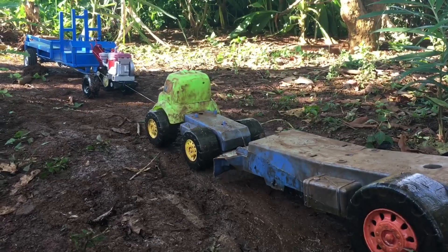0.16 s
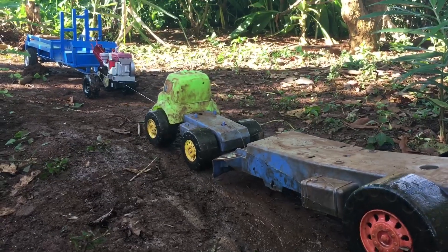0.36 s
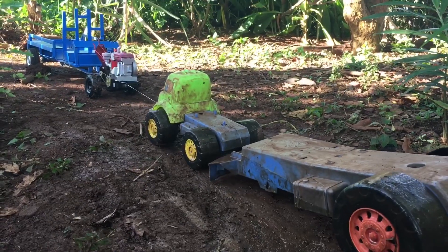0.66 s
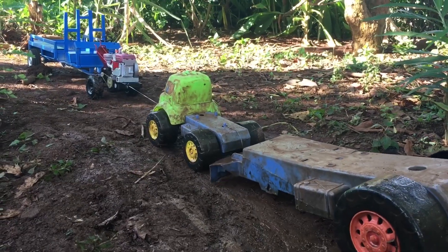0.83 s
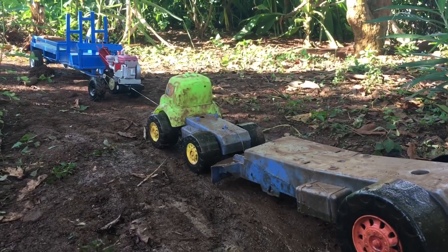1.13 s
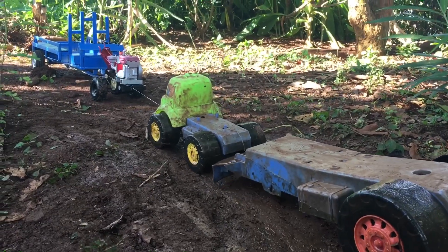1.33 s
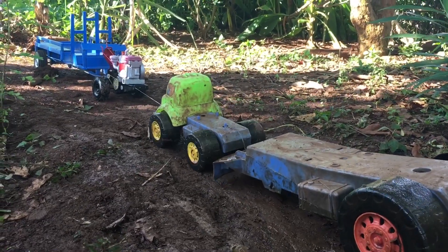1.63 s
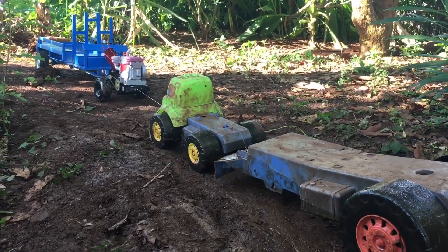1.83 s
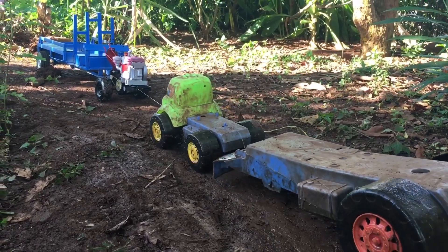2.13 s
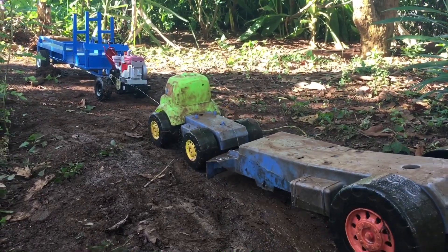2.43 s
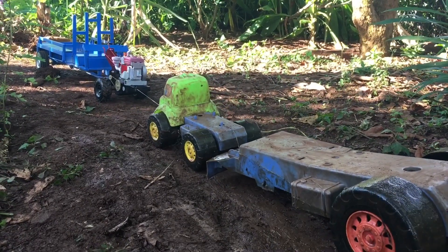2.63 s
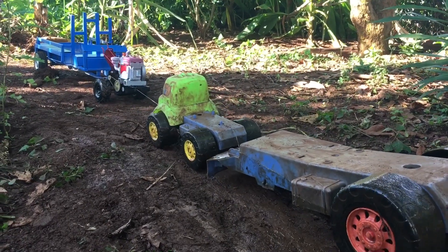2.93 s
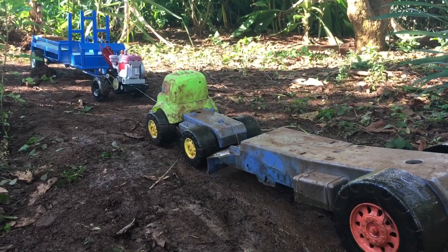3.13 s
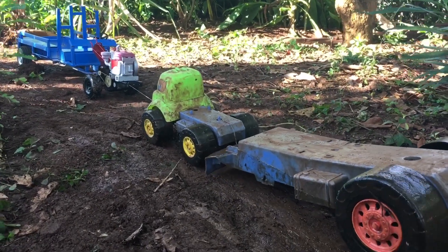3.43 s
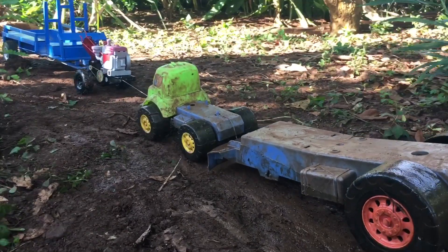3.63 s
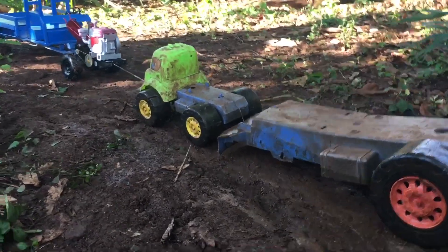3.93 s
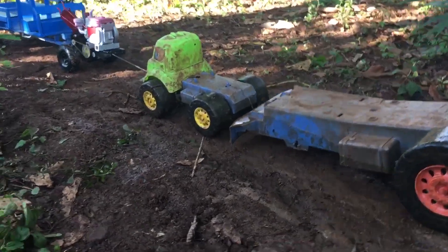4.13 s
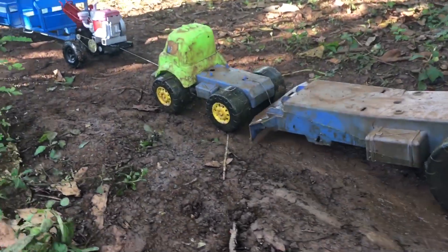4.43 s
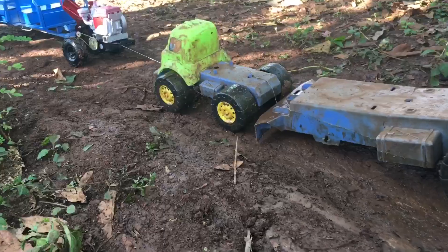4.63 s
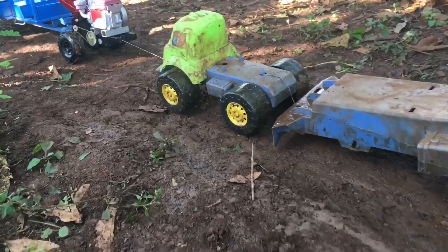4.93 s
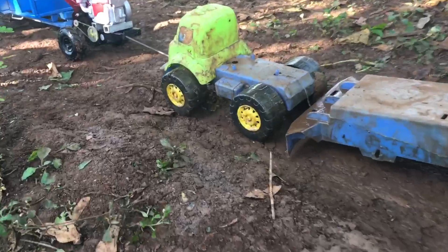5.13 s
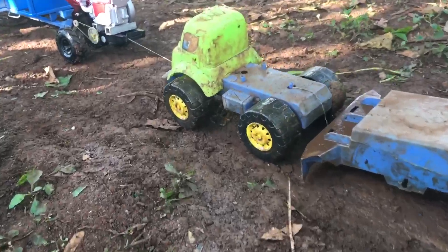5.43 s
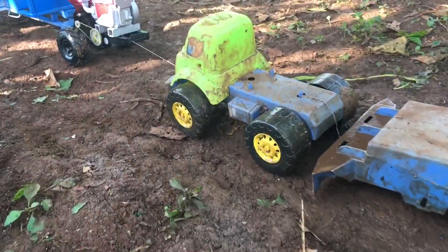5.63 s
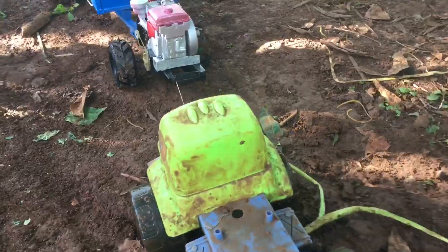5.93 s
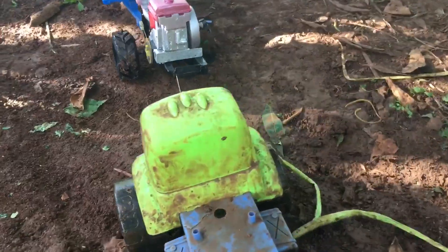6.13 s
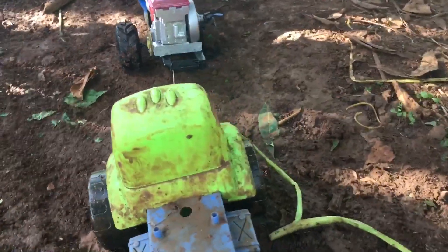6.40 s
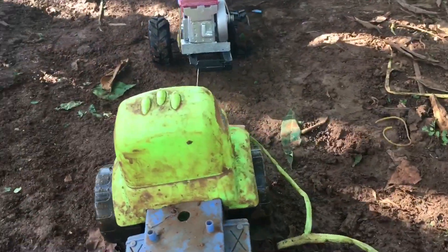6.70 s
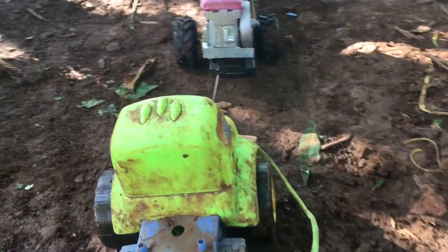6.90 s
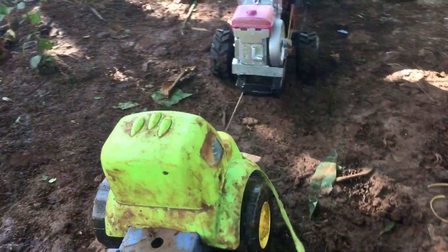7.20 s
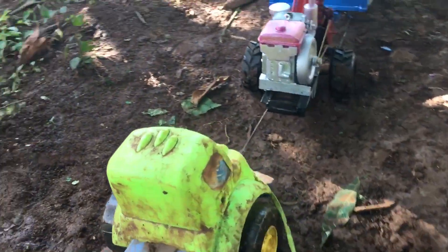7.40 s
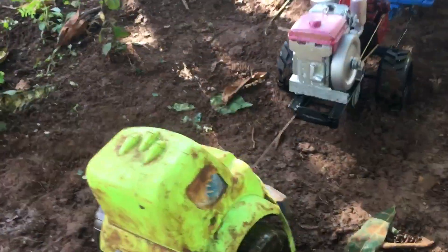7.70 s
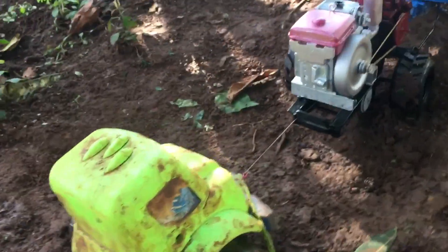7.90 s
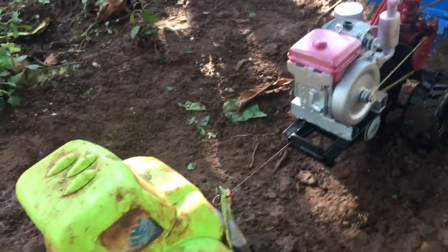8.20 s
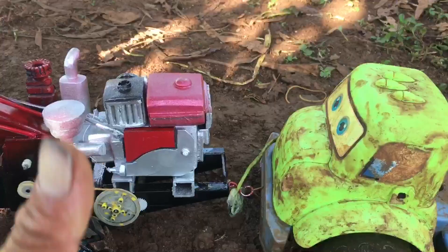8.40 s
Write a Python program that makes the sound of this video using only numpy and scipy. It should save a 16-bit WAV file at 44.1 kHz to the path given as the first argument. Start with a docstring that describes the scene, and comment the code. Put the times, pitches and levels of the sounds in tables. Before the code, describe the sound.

Outdoors on soft earth, a toy winch grinds along at nearly constant pitch, swaying very slightly with each drum turn. Fast gear teeth buzz and rasp in a hollow plastic and metal body, with occasional light clicks. The sound is dry and close, with barely any low outdoor rumble. As the microphone walks around and nearer, its timbre shifts; a brief gap, slightly lower pitch, then it stops.

```python
"""Toy tractor winching in a line

A toy tractor's small electric motor winches in a line over muddy ground, heard from afar, then closer.
Sine tones at multiples of the shaft speed hum and whine; the speed swings with the drum and sags with the pull.
Tooth impacts and rubbing noise chatter through a resonant plastic and metal body, harder once a turn.
The resonances shift as the listener walks round. Filtered noise rumbles low; one brief dip, then a fade-out."""
import sys
import numpy as np
from scipy import signal
from scipy.fft import rfft, irfft, next_fast_len
from scipy.io import wavfile
from scipy.ndimage import uniform_filter1d

SR = 44100
rng = np.random.default_rng(int(sys.argv[2]) if len(sys.argv) > 2 else 0)


def store_pcm(level_fs):
    """Save levels as 16-bit WAV."""
    pcm = np.round(np.clip(level_fs, -1, 1) * 32767).astype(np.int16)
    wavfile.write(sys.argv[1], SR, np.atleast_2d(pcm).T)


N = 377041  # length in samples


def amp(db):
    """Decibels to gain."""
    return 10 ** (np.asarray(db) / 20)


def unit(x):
    """Scale to rms 1."""
    return x / np.sqrt(np.mean(x ** 2) + 1e-20)


def along(points, hz):
    """Read (frequency, value) points on a log frequency axis."""
    point_hz, values = np.transpose(points)
    return np.interp(np.log(hz + 1), np.log(point_hz + 1), values)


def curves(rows):
    """One value per sample for each column after the time."""
    time_s, *columns = np.transpose(rows)
    return [np.interp(np.arange(N) / SR, time_s, column) for column in columns]


def heard_from(place, values):
    """Blend one value per place along the walk."""
    return np.interp(place, np.arange(len(values)), values)


def wobble(rate):
    """A smooth random curve with rate knots a second."""
    knots = rng.standard_normal(int(N * rate / SR) + 4)
    fine = signal.resample_poly(knots, 8, 1)
    fine_at = np.linspace(0, len(knots), len(fine), endpoint=False)
    return np.interp(np.arange(N) * rate / SR, fine_at, fine)


def coloured(x, gain_db):
    """Filter x causally (minimum phase) by a gain in dB that is a function of frequency."""
    size = 2 * next_fast_len(N // 2 + 4096)
    log_gain = np.log(amp(gain_db(np.fft.rfftfreq(size, 1 / SR))))
    cepstrum = irfft(log_gain, size)
    # folding the cepstrum forward in time makes the filter causal
    cepstrum[1:size // 2] *= 2
    cepstrum[size // 2 + 1:] = 0
    response = np.exp(rfft(cepstrum))
    return irfft(rfft(x, size) * response, size)[:N]


def below(x, hz):
    """The part of x under a frequency, without delay."""
    lowpass = signal.butter(3, min(hz, SR / 3), fs=SR, output="sos")
    return signal.sosfiltfilt(lowpass, x)


# spectrum of the outdoor rumble, relative: freq_hz, density_db (per Hz)
RUMBLE_SPECTRUM = [(10, -52), (20, -40.5), (28, -28), (40, -9), (56, -1.5), (63, 6.5), (70, -4.5),
                   (100, -4.5), (150, -13.5), (200, -28), (400, -22.5), (1500, -70)]
RUMBLE_DB, RUMBLE_SWELL_DB = -57, .7  # level and scale of the slow swells


def outdoors():
    """A faint low rumble: shaped noise that swells slowly."""
    level_db = RUMBLE_DB + RUMBLE_SWELL_DB * wobble(1)
    rumble = coloured(rng.standard_normal(N), lambda hz: along(RUMBLE_SPECTRUM, hz))
    return amp(level_db) * unit(rumble)


# the motor slows as the pull grows: time_s, mean_speed_hz (shaft turns per second)
SHAFT_SPEED = [(0, 119.7), (1.6, 119.75), (3.5, 120.2), (5.74, 119.7), (5.79, 118), (6.1, 117.7),
               (6.7, 117.9), (7.3, 117.3), (8.35, 116.5)]
# the load eases once per turn of the winch drum: turn length, first easy moment, swing of shaft speed
DRUM_TURN_S, DRUM_EASY_S, DRUM_SWING_HZ = 1.27, .97, .36
DRIFT_HZ = .08  # scale of the chance drift of shaft speed


def shaft_speed():
    """Turns a second: the speed sags under the pull and swings with each turn of the drum."""
    mean_hz, = curves(SHAFT_SPEED)
    drum = np.cos(2 * np.pi * (np.arange(N) / SR - DRUM_EASY_S) / DRUM_TURN_S)
    return mean_hz + DRUM_SWING_HZ * drum + DRIFT_HZ * wobble(7)


# the listener's walk: time_s, place (0 far, 1 nearer, 2 side, 3 front, 4 close)
LISTENER_WALK = [(3.1, 0), (3.8, 1), (4.2, 1), (5.1, 2), (5.75, 2), (5.78, 3), (6.5, 3), (7.55, 4),
                 (7.95, 4), (8.35, 3.65)]


def listener_place():
    """Where the listener stands; fractions blend two neighbouring places."""
    place, = curves(LISTENER_WALK)
    return place


def tone(turns, order):
    """A sine at one multiple (order) of the shaft speed, rms 1."""
    return np.sqrt(2) * np.sin(2 * np.pi * (order * turns + rng.random()))


# low tones from each place, before flutter: shaft_order, far_db, nearer_db, side_db, front_db, close_db
HUM_TONES = [(2, -50.5, -51, -47.5, -44.5, -47), (6, -44.5, -47, -52, -52, -44.5),
             (8, -53.5, -48.5, -48.5, -46, -43)]
# loudest low tone, shaft order 4, before flutter: time_s, level_db
MAIN_TONE_LEVEL = [(0, -40.5), (3.4, -40), (4.55, -47), (4.95, -42.5), (6.1, -40.5), (6.75, -42),
                   (7.8, -47), (8.35, -57)]


def hum(turns, place, flutter_db):
    """The motor's clean low tones, at even multiples of the shaft speed; the higher ones flutter more."""
    levels = [(order, heard_from(place, by_place)) for order, *by_place in HUM_TONES]
    levels.append((4, curves(MAIN_TONE_LEVEL)[0]))
    out = np.zeros(N)
    for order, level_db in levels:
        flutter = flutter_db * (order / 2) * wobble(14)
        out += amp(level_db + flutter) * tone(turns, order)
    return out


# weaker whine from three sides, relative to the whine's level: shaft_order, far_db, side_db, front_db
WHINE_TONES = [(5, -23.5, -20, -30), (10, -16, -11.5, -10), (12, -17.5, -8, -16.5), (13, -28, -16.5, -14),
               (14, -6, -8, -6.5), (15, -12.5, -17, -9), (16, -13, -13, -10.5), (18, -7, -8, -9.5),
               (20, -4.5, -7, -11.5), (22, -9.5, -11, -12), (24, -13, -19, -13.5), (26, -19, -15, -5)]


def whine(turns, place, level_db, backlash, flutter_db):
    """Higher shaft orders; play in the gears makes each waver in phase and strength."""
    out = np.zeros(N)
    for order, *by_side in WHINE_TONES:
        relative_db = np.interp(place, [0, 2, 3], by_side)
        flutter = flutter_db * (wobble(8) + wobble(35))
        loose_turns = turns + backlash * (wobble(12) + wobble(60))
        out += amp(level_db + relative_db + flutter) * tone(loose_turns, order)
    return out


def teeth(turns, scatter, size_db, count):
    """One tiny impact for each of count teeth a turn, uneven in time and size."""
    tooth = np.arange(int(turns[-1] * count))
    chance = rng.standard_normal((len(tooth), 2))
    impact_turn = (tooth + scatter * chance[:, 0]) / count
    sample = np.round(np.interp(impact_turn, turns, np.arange(N))).astype(int)
    return unit(np.bincount(sample, amp(size_db * chance[:, 1]), N))


def rattle(turns, depth_db, sharpness, uneven):
    """Gain of an off-centre pinion that bites once per turn given, with random strength."""
    bite = np.abs(np.sin(np.pi * turns)) ** (2 * sharpness)
    strength = np.clip(1 + uneven * rng.uniform(-1.07, 1, int(turns[-1]) + 1), 0, None)
    gain = 1 + (amp(depth_db) - 1) * bite * strength[turns.astype(int)]
    return gain / np.sqrt(uniform_filter1d(gain ** 2, SR // 4))  # even power over quarter seconds


# teeth that catch with a light click, relative level: start_s, level_db
TOOTH_CLICKS = [(2.5425, -14), (4.1425, -13), (5.304, -9), (6.592, -16), (7.1401, -18), (7.6644, -18),
                (7.707, -16.5), (7.8959, -14), (8.076, -7.5), (8.3085, -7.5)]


def clicks(t60, click_db):
    """Short decaying noise bursts of force where a tooth catches and lets go."""
    out, t = np.zeros(N), np.arange(SR // 40) / SR
    for start_s, level_db in TOOTH_CLICKS:
        decay = amp(level_db + click_db - 60 * t / t60)
        out[round(start_s * SR):][:len(t)] += decay * rng.standard_normal(len(t))
    return out


def shell(blows, ring_db, t60):
    """Each blow goes on rattling as a decaying noise tail inside the hollow shell."""
    t = np.arange(SR // 20) / SR
    answer = rng.standard_normal(len(t)) * amp(-60 * t / t60) * (t > .001)
    answer *= amp(ring_db) / np.linalg.norm(answer)
    answer[0] = 1  # the blow itself
    return signal.fftconvolve(blows, answer)[:N]


# the body's broad slope from each place: freq_hz, level_db (relative)
FAR_BODY_SLOPE = [(150, -13), (400, -13.5), (600, -10), (900, -1), (2500, -6), (7000, -6.5), (10500, -14.5),
                  (15500, -12)]
NEARER_BODY_SLOPE = [(150, -17.5), (400, -16), (600, -15), (900, -4), (2500, -10), (7000, 0.5),
                     (10500, -12.5), (15500, -15.5)]
SIDE_BODY_SLOPE = [(150, -18.5), (400, -17.5), (600, -11.5), (900, -7.5), (2500, -1), (7000, -1.5),
                   (10500, -14), (15500, -16.5)]
FRONT_BODY_SLOPE = [(150, -17.5), (400, -15.5), (600, -11.5), (900, -4), (2500, -10.5), (7000, -9.5),
                    (10500, -14.5), (15500, -17)]
CLOSE_BODY_SLOPE = [(150, -17.5), (400, -16.5), (600, -12.5), (900, -1.5), (2500, -9), (7000, -6.5),
                    (10500, -10.5), (15500, -16.5)]
# the body's resonances and dips from each place: centre_hz, width_hz, boost_db (negative for a dip)
FAR_BODY_MODES = [(1335, 36, 7.5), (1680, 78, 4.5), (2000, 130, -4), (2455, 1200, 11), (3470, 170, -6.5),
                  (4110, 1260, 8), (4569, 77, 7), (6040, 680, 9.5), (7110, 490, 8.5), (8330, 920, 4.5),
                  (9580, 1100, 7.5), (12753, 800, 2.6)]
NEARER_BODY_MODES = [(760, 45, -2), (1270, 126, 11), (1686, 120, 7), (2483, 1070, 12.5), (3150, 65, 4.5),
                     (3470, 196, -5), (4240, 1200, 4.7), (5900, 121, 3.5), (6300, 156, 2),
                     (7050, 510, 10.5), (7207, 1270, -10), (12464, 651, 2)]
SIDE_BODY_MODES = [(770, 39, -9), (946, 170, 6), (1140, 41, -12.5), (1250, 440, 5.5), (2900, 129, 5.5),
                   (3550, 240, -5.5), (4160, 110, 4.5), (4540, 177, 8), (5930, 60, -0.5), (7830, 982, -3),
                   (9100, 335, 4), (12469, 384, 3.5)]
FRONT_BODY_MODES = [(855, 90, -3), (1600, 310, 6.5), (2750, 970, 11.5), (3080, 260, 4.5), (4350, 1100, 10),
                    (5540, 570, 9), (6306, 646, 4), (7020, 390, 11), (8840, 840, 9), (8830, 331, -6.5),
                    (10060, 188, 5.5), (14183, 490, 7.5)]
CLOSE_BODY_MODES = [(845, 240, -3.5), (1645, 169, 7), (2510, 664, 6), (3087, 450, 10), (4060, 1350, 6),
                    (4920, 270, -5), (5940, 680, 8), (8535, 441, 2.5), (10000, 214, -2), (10500, 330, -10),
                    (12454, 524, 4.5), (13802, 1200, -1.5)]


def body(blows, place):
    """The body rings with each blow; which resonances carry depends on where one stands."""
    views = [(FAR_BODY_SLOPE, FAR_BODY_MODES), (NEARER_BODY_SLOPE, NEARER_BODY_MODES),
             (SIDE_BODY_SLOPE, SIDE_BODY_MODES), (FRONT_BODY_SLOPE, FRONT_BODY_MODES),
             (CLOSE_BODY_SLOPE, CLOSE_BODY_MODES)]
    out = np.zeros(N)
    for index, (slope, modes) in enumerate(views):
        def gain_db(hz):
            """Broad slope plus every resonance and dip of this view."""
            peaks = sum(db / (1 + (2 * (hz - centre) / width) ** 2) for centre, width, db in modes)
            return along(slope, hz) + peaks
        share = np.clip(1 - np.abs(place - index), 0, 1)
        out += share * unit(coloured(blows, gain_db))
    return out


# the gears, one row per place from far to close: chatter_db (before labouring), rattle_db (before bite scaling)
GEAR_PLACES = [(-32.2, 4), (-31, 3.2), (-29.5, 3.5), (-29, 5), (-28.5, 5)]


def gearbox(turns, place, rub_db, clack_bite, fizz_bite, growl_bite, restless_db):
    """Tooth impacts and the rubbing between them shake the body; the rattle clacks most in the low treble."""
    gear_db, depth_db = (heard_from(place, column) for column in np.transpose(GEAR_PLACES))
    impacts = teeth(turns, scatter=.2, size_db=2, count=12)
    rubbing = amp(rub_db) * rng.standard_normal(N)
    force = unit(impacts - impacts.mean() + rubbing)
    # three bands: growl, clack (low treble) and fizz
    growl, under_fizz = below(force, hz=3570), below(force, hz=7800)
    clack, fizz = under_fizz - growl, force - under_fizz
    bite = rattle(turns, clack_bite * depth_db, sharpness=4.9, uneven=0.98)
    treble = clack * bite + fizz * bite ** fizz_bite
    # the growl bites twice a shaft turn
    growl = growl * rattle(2 * turns, growl_bite * depth_db, sharpness=2.1, uneven=1.0)
    load = amp(restless_db * (wobble(70) + wobble(22)))  # the line tugs unevenly
    # dividing by the gear gain keeps the clicks from following it
    blows = (growl + treble) * load + clicks(t60=0.02, click_db=-12) / amp(gear_db)
    return amp(gear_db) * body(shell(blows, ring_db=-10.5, t60=0.046), place)


# below this shaft speed the gears grind louder, by so many dB per Hz lost
LABOUR_HZ, LABOUR_DB_PER_HZ = 117.65, 1.56


def labour(speed_hz):
    """Gain of the gears, which grind louder as the motor labours, over at most 2 Hz of lost speed."""
    return amp(LABOUR_DB_PER_HZ * np.clip(LABOUR_HZ - speed_hz, 0, 2))


def scene():
    """One shaft drives hum, whine and gears over the outdoor rumble."""
    background = outdoors()
    speed_hz = shaft_speed()
    turns = np.cumsum(speed_hz) / SR
    place = listener_place()
    motor = hum(turns, place, flutter_db=0.28)
    motor = motor + whine(turns, place, level_db=-40.0, backlash=0.0036, flutter_db=1.87)
    gears = gearbox(turns, place, rub_db=5.5, clack_bite=1.28, fizz_bite=0.79, growl_bite=0.44,
                    restless_db=0.5)
    return (background + motor + labour(speed_hz) * gears)[None]


# moments of silence, brief and final, and the length of each ramp
DIP_S, END_S, FADE_S = 5.766, 8.402, .03
TOP_HZ = 15750  # nothing is left above this


def record(dry):
    """The level dips briefly and fades out; a highpass and a steep top cut limit the band."""
    size = next_fast_len(N + SR // 2)
    hz, t = np.fft.rfftfreq(size, 1 / SR), np.arange(N) / SR
    nearest_silence_s = np.minimum(np.abs(t - DIP_S), END_S - t)
    fade = np.clip(nearest_silence_s / FADE_S, 0, 1) ** 1.16
    highpass = signal.butter(4, 24, "high", fs=SR, output="sos")
    faded = signal.sosfilt(highpass, dry) * fade
    top_cut = np.clip((TOP_HZ - hz) / 60, 0, 1)
    return irfft(rfft(faded, size) * top_cut, size)[:, :N]


dry = scene()
out = record(dry)
store_pcm(out)
```